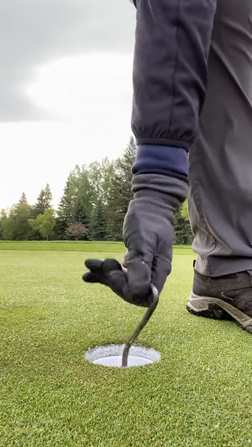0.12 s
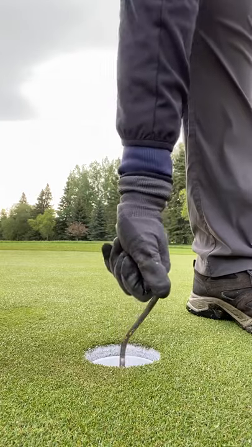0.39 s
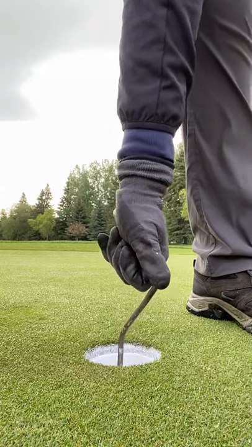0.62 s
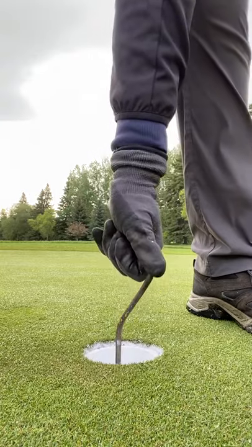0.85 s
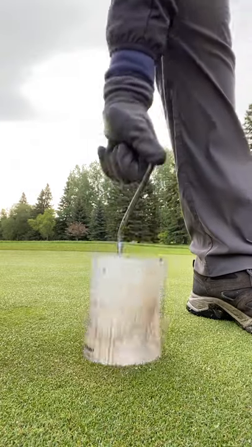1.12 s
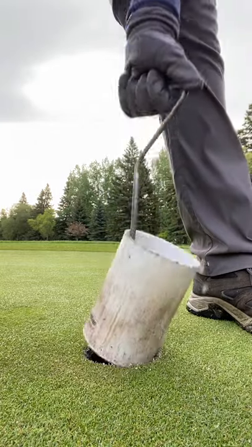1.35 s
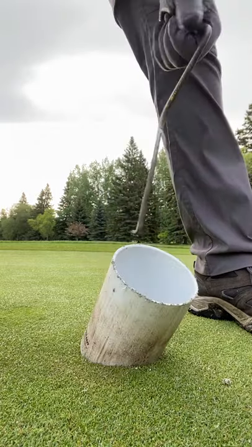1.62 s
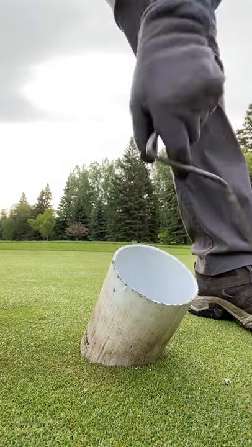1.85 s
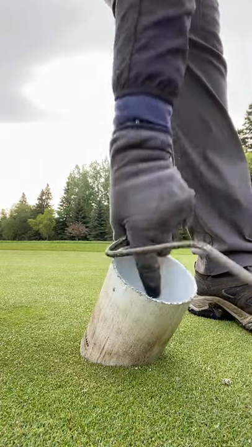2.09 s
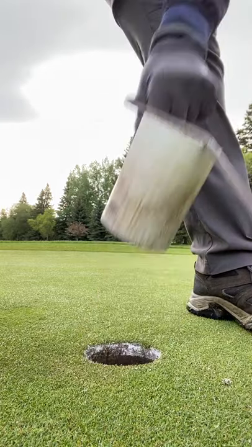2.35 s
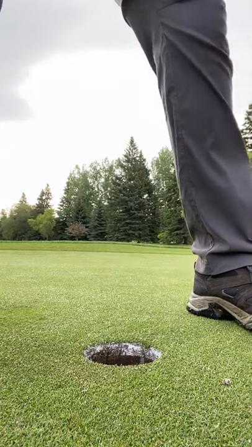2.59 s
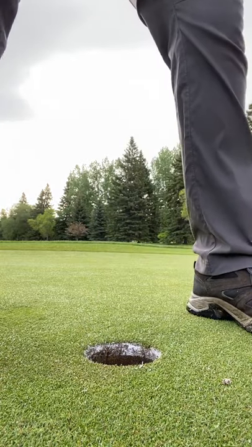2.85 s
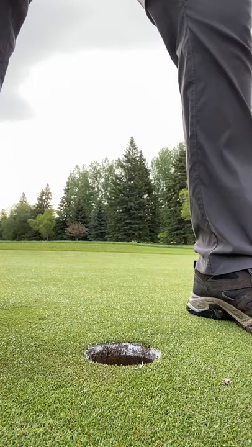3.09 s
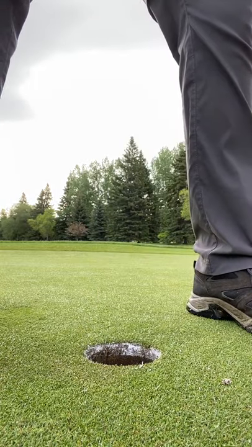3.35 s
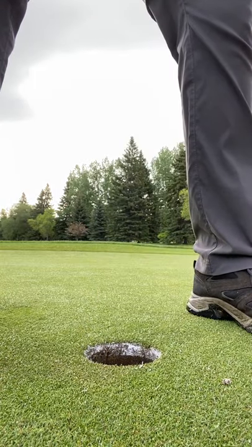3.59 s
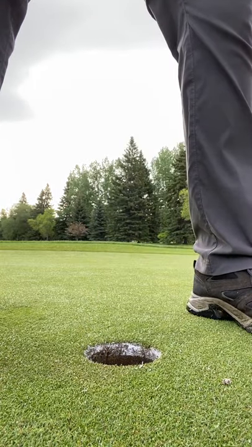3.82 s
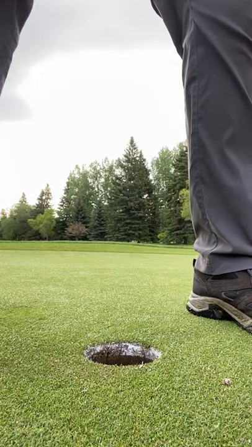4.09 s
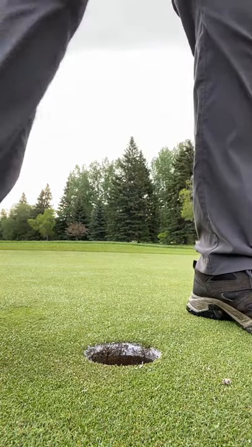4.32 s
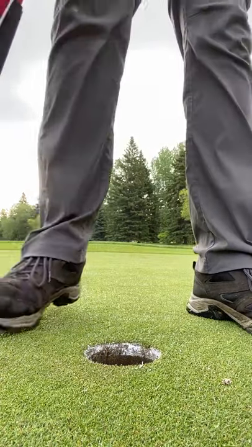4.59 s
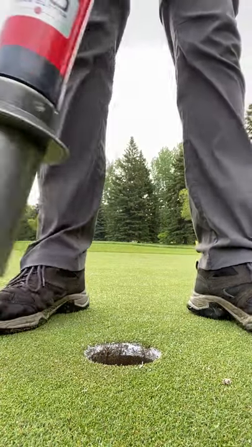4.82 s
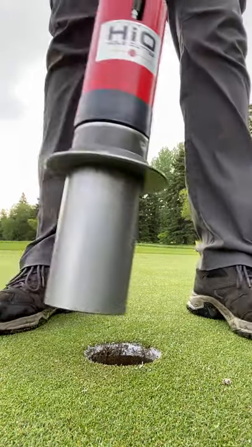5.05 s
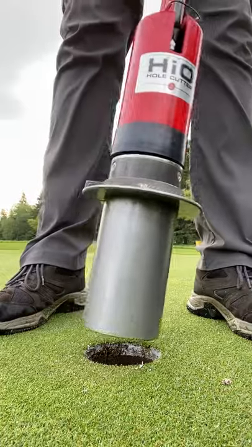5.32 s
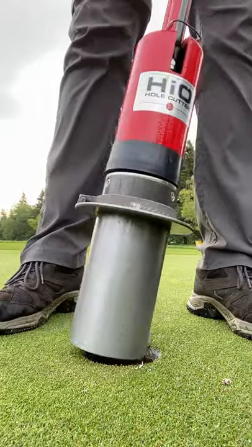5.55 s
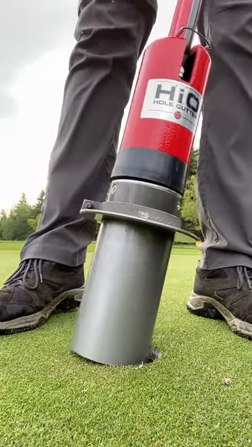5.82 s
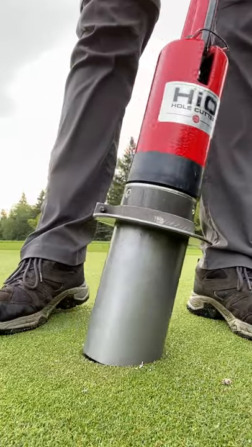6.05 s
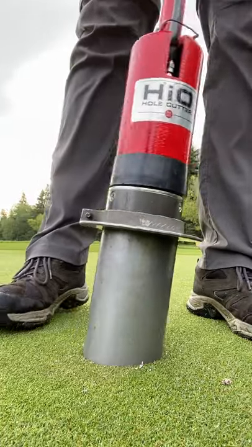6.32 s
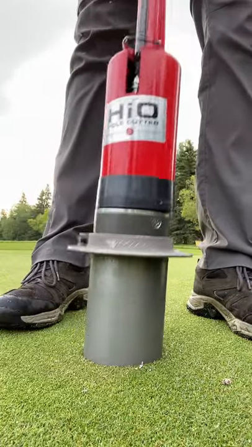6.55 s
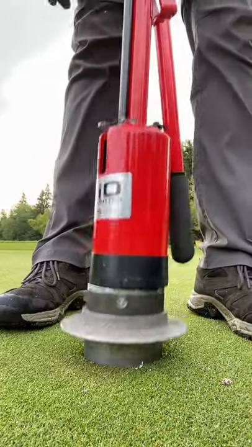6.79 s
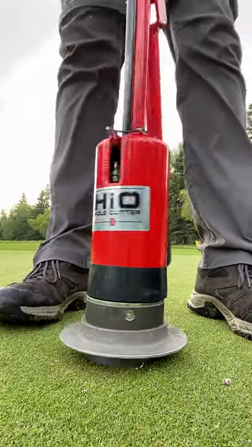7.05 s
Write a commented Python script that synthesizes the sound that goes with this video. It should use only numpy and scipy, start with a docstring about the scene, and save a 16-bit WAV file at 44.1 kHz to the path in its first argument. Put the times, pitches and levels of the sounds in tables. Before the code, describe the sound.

A plastic cup pops hollowly out of a turf hole, clatters onto a booming tray, then a steel cutter clinks, squeaks and thuds into the ground.

```python
"""Cup, tray and hole cutter on a putting green

A steel hook pulls a plastic cup out of its hole; cup and hook are dropped on a hollow tray that rings more
to the right. A steel hole cutter clinks, squeaks and slides into the hole. Blows are decaying modes with a
noisy crack, scrapes and rocking are noise through resonances, squeak and one bird chirp are gliding tones;
clothes and turf rustle, a far engine rumbles and the open air hisses as shaped stereo noise."""
import sys
import numpy as np
from scipy import signal
from scipy.fft import rfft, irfft, next_fast_len
from scipy.io import wavfile
from scipy.ndimage import uniform_filter1d, map_coordinates

SR = 44100
rng = np.random.default_rng(int(sys.argv[2]) if len(sys.argv) > 2 else 0)


def master(y):
    """Save y as 16-bit WAV."""
    cut = np.clip(np.atleast_2d(y).T, -1, 1)
    pcm = np.round(cut * 32767)  # scale
    wavfile.write(sys.argv[1], SR, pcm.astype(np.int16))


def amplitude_ratio(level_db):
    """Convert a level in decibels to the matching linear amplitude (field) ratio."""
    exponent = np.asarray(level_db, float) / 20
    return 10 ** exponent


N = 316197

# Blows on the cup, the tray, the cutter and, as the cutter thumps its rim, the hole. Each row: time in
# seconds, level in dB, struck pitch in Hz, crack in dB over the usual crack of that object.
CUP_BLOWS = [(.24, -17.5, 830, -14), (.326, -54.5, 4000, 7), (1.214, -19.5, 1037, -39),
             (1.221, -23.5, 970, -31), (1.294, -28.5, 1360, -14.5), (1.317, -32, 734, 1),
             (1.328, -1.5, 910, -26.5), (1.371, -53.5, 3000, 22), (1.409, -32.5, 477, -7.5),
             (1.438, -17, 524, -11.5), (1.493, -32, 2000, 7), (2.11, -28.5, 554, -16),
             (2.254, -39, 2300, 2.5), (2.291, -34, 3100, 1)]
TRAY_BLOWS = [(3.1, -7.5, 340, -11.5), (3.128, -7, 584, -6), (3.155, -6, 412, -10), (3.3, -12, 290, -14),
              (3.321, -18, 490, -5), (3.457, -22, 273, -8), (3.748, -14, 570, -18.5),
              (3.852, -22, 466, -8.5), (3.91, -14, 490, -10.5), (3.966, -11.5, 490, -21),
              (3.993, -14.5, 474, -7.5), (4.008, -16.5, 218, 5), (4.036, -4.5, 244, -15.5),
              (4.091, -19.5, 240, -1), (4.107, -14.5, 486, -12), (4.16, -13.5, 544, -9),
              (4.175, -9, 277, -23), (4.218, -40, 213, 11.5), (4.663, -39.5, 710, 5)]
CUTTER_BLOWS = [(6.047, -11.5, 2890, -14), (6.0791, -19, 2210, -11), (6.554, -32.5, 3000, -20.5),
                (6.578, -33, 2980, -28), (6.6653, -26.5, 4470, -29), (6.8838, -23.5, 2520, -17.5),
                (6.8985, -1, 2530, -40.5), (6.9751, -18, 2500, -33.5), (6.9914, -6, 2200, -41.5),
                (7.0, -1.5, 2200, -35), (7.0539, -18, 2200, -26.5), (7.1117, -9, 2610, -29)]
HOLE_BLOWS = [(6.053, -19, 305, -33), (6.992, -14, 570, -29), (7.006, -18.5, 305, -34)]
# Modes of each object. Each row: nominal frequency in Hz, relative level in dB, undamped t60 in seconds.
CUP_MODES = [(484, -7, 0.58), (753, -0.5, 0.025), (1376, 0.5, 0.091), (1850, 11.5, 0.0092),
             (2610, 1.5, 0.1), (2970, -12, 0.093), (3510, 3.5, 0.065), (3840, 13.5, 0.016),
             (4440, 7.5, 0.074)]
TRAY_MODES = [(120, 0, 0.76), (218, 6, 0.87), (290, 5.5, 0.67), (374.6, 1.5, 0.23), (490, 3.5, 0.86),
              (570, 0, 0.79)]
CUTTER_MODES = [(1540, 3, 0.043), (2200, 2, 0.085), (2530, 0.5, 0.081), (2890, 2, 0.048), (3030, -9, 0.21),
                (3310, -7, 0.27), (3560, -12, 0.32), (4775, 3, 0.13), (5570, 7, 0.19), (6700, -8.5, 0.43),
                (7760, -6, 0.44), (8480, 1, 0.4), (11200, -8.5, 0.54)]
HOLE_MODES = [(305, -14, 0.28), (570, -7, 0.058)]
# The load rocks on the tray. Each row: start in seconds, length in seconds, first and last level in dB.
ROCKING_STROKES = [(3.35, 0.19, -27.5, -40), (3.997, 0.28, -29, -41)]
# Cup out of the hole, hook off the cup, load sliding on the tray, cutter into the hole. Each row: start in
# seconds, length in seconds, first level in dB, last level in dB, centre of the resonance in Hz.
SCRAPE_STROKES = [(1, 0.18, -43.5, -37.5, 4440), (1.482, 0.028, -31.5, -69, 3080),
                  (3.191, 0.27, -56, -48, 2260), (3.809, 0.44, -44, -44, 1700),
                  (4.371, 0.062, -43, -46.5, 2530), (6.978, 0.19, -38, -33.5, 2460)]
# Squeak of steel on steel. Each row: time in seconds, pitch in Hz, level in dB.
SQUEAK_GLIDE = [(6.458, 2930, -47), (6.488, 3040, -31), (6.512, 3010, -51)]
# Movements of cloth and turf. Each row: start in seconds, length in seconds, first and last level in dB.
RUSTLE_STROKES = [(0.65, 0.27, -49.5, -62), (0.982, 0.27, -33.5, -51.5), (1.925, 0.4, -56.5, -45.5),
                  (4.38, 0.7, -55.5, -64), (6.144, 0.55, -59.5, -43.5), (6.568, 0.31, -56.5, -37.5)]
# Spectrum of the rustle. Each row: frequency in Hz, relative density in dB per Hz.
CLOTH_SPECTRUM = [(1500, 9.5), (9000, 7)]
# Bird chirp. Each row: time in seconds, pitch in Hz, level in dB.
BIRD_GLIDE = [(2.385, 3100, -63), (2.408, 2550, -53), (2.43, 3500, -66), (2.452, 4100, -57)]
# Engine rumble and far hiss. Each row: frequency in Hz, relative density in dB per Hz.
AIR_SPECTRUM = [(30, -26.5), (59, -2.5), (148, -7), (200, -17), (534, -27), (1230, -31.5), (2300, -38.5),
                (4500, -45), (15500, -59.5)]
# Correlation of the two sides in the open air. Each row: frequency in Hz, likeness from 0 to 1.
AIR_LIKENESS = [(60, 1.0), (380, 0.93), (2380, 0.34)]
# Colour of the sound: a hole near 5 kHz and a weaker treble. Each row: frequency in Hz, gain in dB.
TREBLE_COLOUR = [(4900, 0.5), (5350, -16), (6700, -4), (13500, -11.5), (14700, -19)]


def unit(x):
    """Normalization: scaled to rms 1."""
    return x / np.sqrt(np.mean(x ** 2) + 1e-20)


def along(points, hz):
    """Interpolation of (Hz, value) points on a logarithmic frequency axis."""
    f, v = np.transpose(points)
    return np.interp(np.log(hz + 1), np.log(f + 1), v)


def curves(rows, silent=None):
    """Linear interpolation in time: one value per sample for each column after the time."""
    s, *cols = np.transpose(rows)
    return [np.interp(np.arange(N) / SR, s, c, silent, silent) for c in cols]


def wobble(rate):
    """Band-limited random modulation: a smooth curve with rate knots a second."""
    knots = rng.standard_normal(int(N * rate / SR) + 4)
    return map_coordinates(knots, [np.arange(N) * rate / SR])


def filtered(x, response):
    """Linear filtering: the spectrum of x times a response of frequency."""
    m = next_fast_len(x.shape[-1] + 8192)
    spectrum = rfft(x, m) * response(np.fft.rfftfreq(m, 1 / SR))
    return irfft(spectrum, m)[..., :x.shape[-1]]


def sides(db):
    """Level difference between two ears: left and right gains, left louder when db is positive."""
    return amplitude_ratio(np.array([db / 2, -db / 2]))


def hump(f, hz, octaves):
    """Broad resonance: a bell around hz on an octave scale."""
    return np.exp(-.5 * (np.log2((f + 1) / hz) / octaves) ** 2)


def resonances(f, modes, width_hz):
    """Modal superposition: the summed response of damped resonators of equal bandwidth."""
    return sum(amplitude_ratio(db) * 1j * f * width_hz / (hz * hz - f * f + 1j * f * width_hz) for hz, db, _ in modes)


def rush(spectrum, alike):
    """Partial coherence: stereo noise of rms 1 from a shared middle and an opposed side part."""
    def shape(hz):
        turn = np.arccos(np.clip(along(alike, hz), 0, 1)) / 2
        return amplitude_ratio(along(spectrum, hz)) * [np.cos(turn), np.sin(turn)]
    mid, side = filtered(rng.standard_normal((2, N)), shape)
    return unit(np.array([mid + side, mid - side]))


def stroke(start, length, first_db, last_db):
    """Envelope of one movement: it sets in, drifts from one level to the other and stops."""
    rise_db_per_s, fall_db_per_s = 346, 289
    t = np.arange(N) / SR - start
    edges_db = rise_db_per_s * np.clip(-t, 0, None) + fall_db_per_s * np.clip(t - length, 0, None)
    return amplitude_ratio(first_db + (last_db - first_db) * np.clip(t / length, 0, 1) - edges_db)


def ringing(t, modes, struck_hz, dull, reach_db, rise, press, left, ring_pan_db, apart, detune, rough, freedom):
    """Modal vibration: damped sinusoids, strongest near the struck pitch, muted while parts stay pressed."""
    hz, level, t60 = np.transpose(modes)[:, :, None]
    octaves = np.log2(hz / struck_hz)
    # a dull blow picks out fewer modes and hardly reaches the high ones
    strength = level - reach_db * (1 + 1.04 * dull) * np.sqrt(abs(octaves))
    strength = strength - 2.3 * dull * np.clip(octaves, 0, None) + rng.normal(0, 1.96, hz.shape)
    # hand, load or soil shift the modes a little each time
    held = hz * (1 + detune * rng.standard_normal(hz.shape))
    # each mode reaches the two sides out of step (radians)
    lag = apart * np.clip(hz / 600, 0, 1) * rng.standard_normal(hz.shape)
    pan_db = ring_pan_db * np.clip(hz / 500, 0, 1)  # the bass arrives alike on both sides
    # loose parts keep touching: the ring is uneven
    knots = rng.standard_normal((len(hz), 40))
    places = np.broadcast_arrays(np.arange(len(hz))[:, None], 70 * t)
    flutter = rough * map_coordinates(knots, places, order=1)
    uneven_db = 6.4 * flutter * np.clip(t / (3 * press), 0, 1)
    decay = amplitude_ratio(strength - strength.max() + uneven_db - 60 * t / (freedom * t60))
    phase = 2 * np.pi * held * t + 1.06 * flutter[::-1]
    ring = np.array([np.sum(decay * amplitude_ratio(side * pan_db) * np.sin(phase + side * lag), 0) for side in (.5, -.5)])
    # the parts stay pressed together and soon mute most of the ring
    left = np.clip(left, 0, 1)
    contact = left + (1 - left) * np.exp(-(t / press) ** 2)
    return ring * contact * (1 - np.exp(-t / (rise * (1 + dull))))  # a dull blow builds up slower


def cracking(t, lead, level_db, tilt_db, crack_t60):
    """Contact noise: coloured grit swells while the parts graze, then decays, its treble first."""
    slope_db = tilt_db + 0.55 * level_db  # a sharper blow cracks brighter
    # every contact has its own colour
    bumps = list(zip(np.geomspace(600, 16000, num=14), 3 * rng.standard_normal(14)))

    def colour(f):
        return f / (f + 900) * amplitude_ratio(slope_db * np.log2(f / 2500 + 1) + along(bumps, f))
    shared, own = rng.standard_normal((2, len(t)))
    pair = shared + np.outer([.25, -.25], own)  # the two sides hear the contact a little differently
    grit = unit(filtered(pair, colour))
    duller = filtered(grit, lambda f: amplitude_ratio(-f / 1300))
    grazing = 0.5 * (t / lead) ** 3 * grit
    long_part = duller * amplitude_ratio(-60 * (t - lead) / crack_t60)
    short_part = 0.63 * grit * amplitude_ratio(-60 * (t - lead) / 0.014)
    return amplitude_ratio(level_db) * np.where(t < lead, grazing, long_part + short_part)


def scattered(dry, t):
    """Diffuse reflection: the ground scatters each blow as a fresh decaying noise tail."""
    tail = rng.standard_normal((2, SR // 4)) * amplitude_ratio(-60 * t[:SR // 4] / .14)
    return signal.fftconvolve(dry, tail / np.linalg.norm(tail[0]), axes=1)[:, :len(t)]


def blows(events, modes, reach_db, rise, press, left, ring_pan_db, crack_t60, crack_db, tilt_db, apart,
          detune=.025, rough=1, free=lambda s: 1):
    """Impact excitation: each blow rings the modes, cracks at the contact and scatters off the ground.

    reach_db is lost one octave off the struck pitch, more if dull; rise, press and crack_t60 are in seconds;
    left is the share of ring that stays; apart is in radians; free(s) scales the t60 of the modes."""
    out, t = np.zeros((2, N + SR)), np.arange(SR // 2) / SR
    lead = .008  # the parts graze for some ms before they meet (s)
    for s, db, struck_hz, sharp_db in events:
        dull = np.clip(-(crack_db + sharp_db) / 20, 0, 2)
        ring = ringing(t, modes, struck_hz, dull, reach_db, rise, press, left, ring_pan_db, apart,
                       detune, rough, free(s))
        ring = np.pad(ring, ((0, 0), (round(lead * SR), 0)))[:, :len(t)]
        dry = ring + cracking(t, lead, crack_db + sharp_db, tilt_db, crack_t60)
        hit = dry + amplitude_ratio(-14) * scattered(dry, t)
        out[:, round((s - lead) * SR):][:, :len(t)] += amplitude_ratio(db) * hit
    return out[:, :N]


def cup():
    """Shell vibration: the plastic cup rings briefly under the blows."""
    return blows(CUP_BLOWS, CUP_MODES, reach_db=15.5, rise=0.00029, press=0.017, left=0.07, ring_pan_db=-3.5,
                 crack_t60=0.073, crack_db=7.5, tilt_db=-7.5, apart=0.48)


def tray():
    """Coupled bodies: the hollow tray booms and the cup rings with it as it hits."""
    def free(s):  # the cup first lies on the tray and damps it
        return .5 if s < 3.6 else 1
    boom = blows(TRAY_BLOWS, TRAY_MODES, reach_db=6, rise=0.0015, press=0.016, left=0.087, ring_pan_db=-7.5,
                 crack_t60=0.069, crack_db=-3.0, tilt_db=-9, apart=0.94, free=free)
    tumbles = [(s, db + sharp_db, 3000, -30) for s, db, _, sharp_db in TRAY_BLOWS]
    return boom + blows(tumbles, CUP_MODES, reach_db=11.5, rise=0.00025, press=0.0026, left=0.071,
                        ring_pan_db=2.5, crack_t60=0.017, crack_db=-29, tilt_db=-4, apart=0.4)


def cutter():
    """Damping by a medium: the steel clinks, and the soil shortens its ring as it sinks."""
    def buried(s):
        return np.interp(s, [6.3, 6.9], [1, .6])
    return blows(CUTTER_BLOWS, CUTTER_MODES, reach_db=13.0, rise=0.0013, press=0.0096, left=0.44,
                 ring_pan_db=4.0, crack_t60=0.12, crack_db=16.0, tilt_db=0.5, apart=0.86,
                 detune=0.0041, rough=0.54, free=buried)


def hole():
    """Low modes of a cavity: the hole thumps as the cutter strikes its rim."""
    return blows(HOLE_BLOWS, HOLE_MODES, reach_db=13, rise=0.00082, press=0.0085, left=0.28, ring_pan_db=-6.5,
                 crack_t60=0.024, crack_db=-22, tilt_db=-18, apart=0.25)


def rocking():
    """Random excitation of resonators: the rocking load drums unevenly on the tray."""
    uneven = rng.standard_normal(N) * amplitude_ratio(5 * wobble(60))
    drum = filtered(uneven, lambda f: resonances(f, TRAY_MODES, 30) * hump(f, 260, 1))
    return sides(-8.5)[:, None] * unit(drum) * sum(stroke(*row) for row in ROCKING_STROKES)


def scrapes():
    """Dry friction: hard parts drag as gritty noise in a broad resonance, with narrow ones flaring."""
    sink_oct_per_s = 10.5  # the hollow under the rising cup grows and its resonance sinks
    cutter_from_s = 6
    grit = rng.standard_normal(N) * amplitude_ratio(3.5 * wobble(500))
    hz, _, z = signal.stft(grit, SR, nperseg=256)
    flares = uniform_filter1d(rng.standard_normal(z.shape), size=2, axis=0)
    flares = uniform_filter1d(flares, size=12, axis=1)
    z = z * amplitude_ratio(3.5 * unit(flares))
    t = np.arange(z.shape[1]) * 128 / SR  # frame times
    out = np.zeros(N)
    for i, (start, length, first_db, last_db, centre) in enumerate(SCRAPE_STROKES):
        sunk = sink_oct_per_s * np.clip(t - start, 0, length) * (i == 0)  # the first row is the rising cup
        shape = 0.17 + hump(hz[:, None], centre * 2 ** -sunk, 0.64)
        tone = signal.istft(z * shape, SR, nperseg=256)[1][:N]
        if start > cutter_from_s:  # the rubbed steel sings in its own modes
            tone = filtered(tone, lambda f: 0.25 + hump(f, centre, 1) * resonances(f, CUTTER_MODES, 80))
        out += stroke(start, length, first_db, last_db) * unit(tone)
    return sides(5.3)[:, None] * out


def whistle(rows, overtone_db, rough_db):
    """Frequency modulation: a gliding, trembling tone with one overtone and a rough level."""
    pitch, _ = curves(rows)
    _, level_db = curves(rows, silent=-120)
    turns = 2 * np.pi * np.cumsum(pitch * (1 + .008 * wobble(400))) / SR
    level = uniform_filter1d(amplitude_ratio(level_db), size=200)
    tone = np.sin(turns) + amplitude_ratio(overtone_db) * np.sin(2 * turns)
    return np.sqrt(2) * level * amplitude_ratio(rough_db * wobble(80)) * tone


def squeak():
    """Self-sustained friction tone: steel squeaks on steel with a strong overtone."""
    return whistle(SQUEAK_GLIDE, overtone_db=-8, rough_db=4) * sides(4.0)[:, None]


def rustle():
    """Many small frictions: cloth and turf rub as a fine, slightly grainy hiss."""
    rest_db = -76  # between movements
    motion = amplitude_ratio(rest_db) + sum(stroke(*row) for row in RUSTLE_STROKES)
    grain_db = 1.2 * wobble(45) + 2.5 * wobble(350)
    return motion * amplitude_ratio(grain_db) * rush(CLOTH_SPECTRUM, [(2000, 0.7)])


def bird():
    """Nearly pure tone: one gliding chirp with a faint overtone, alike on both sides."""
    return whistle(BIRD_GLIDE, overtone_db=-30, rough_db=2.5)


def air():
    """Partly coherent background noise: the far engine's rumble and the hiss of the open ground."""
    level_db = -37 + .7 * wobble(5)
    return amplitude_ratio(level_db) * rush(AIR_SPECTRUM, AIR_LIKENESS) * sides(-0.73)[:, None]


def scene():
    """Linear superposition: the sum of all sources."""
    struck = cup() + tray() + cutter() + hole()
    rubbed = rocking() + scrapes() + squeak() + rustle()
    return struck + rubbed + bird() + air()


def roll_off(x):
    """The treble ends steeply here."""
    return signal.sosfilt(signal.butter(12, 16470, fs=SR, output="sos"), x)


def record(dry):
    """Spectral colour and saturation: a hole near 5 kHz and a weaker treble, a band limit and soft overload."""
    top_hz = 15900
    heard = filtered(dry, lambda hz: amplitude_ratio(along(TREBLE_COLOUR, hz)) * (hz < top_hz))
    clipped = heard / (1 + abs(heard / .97) ** 6) ** (1 / 6)  # the loudest peaks flatten softly
    return roll_off(clipped)


dry = scene()
out = record(dry)
master(out)
```